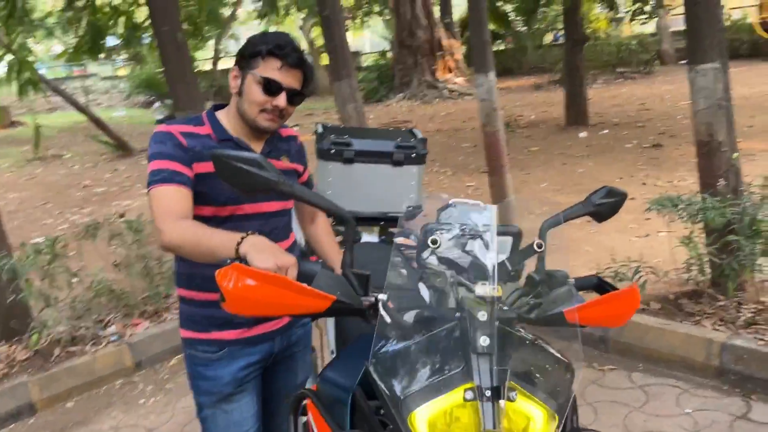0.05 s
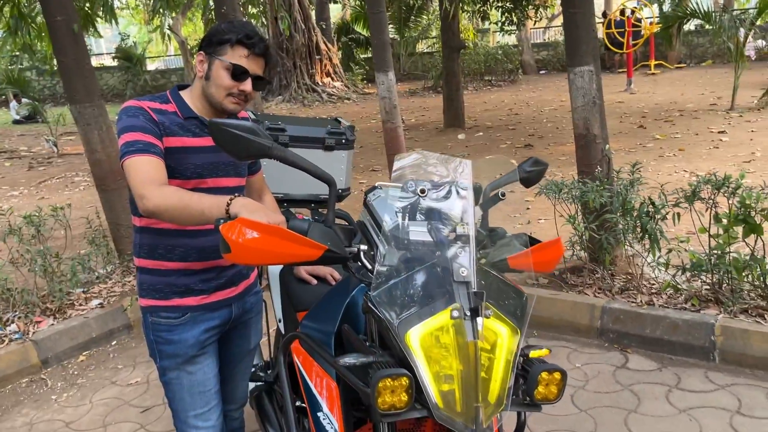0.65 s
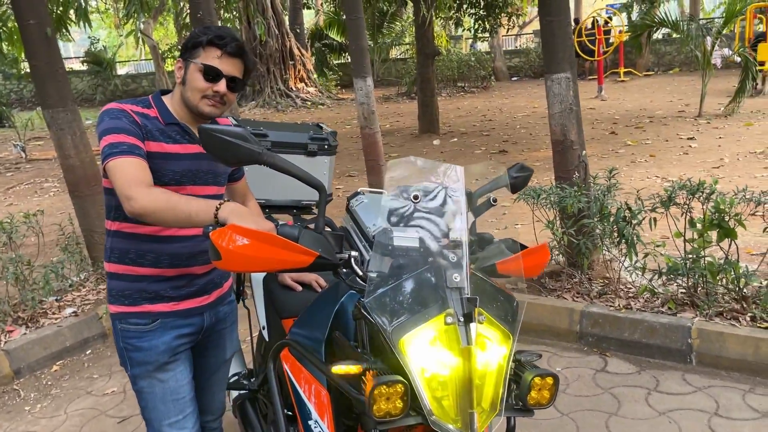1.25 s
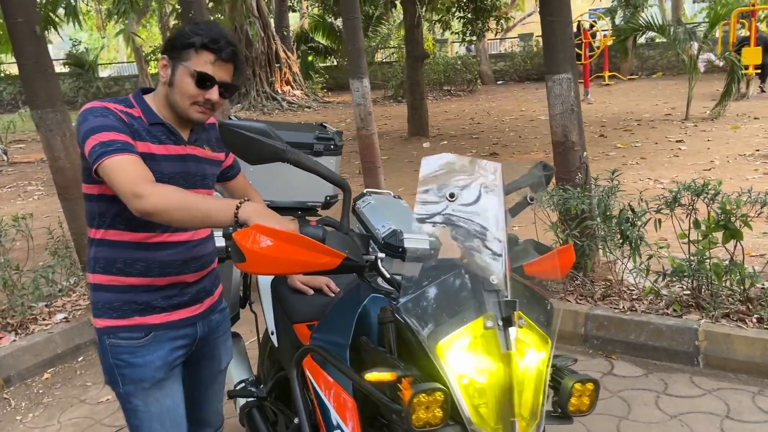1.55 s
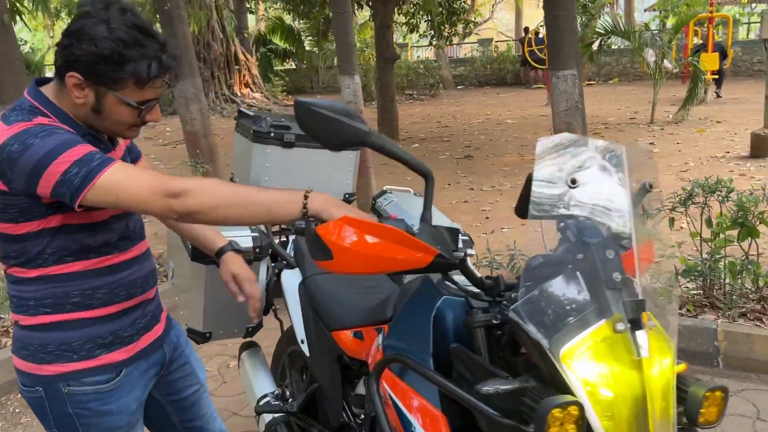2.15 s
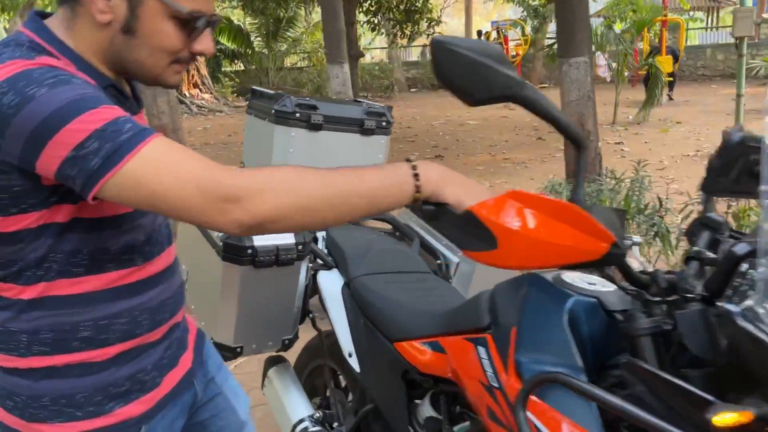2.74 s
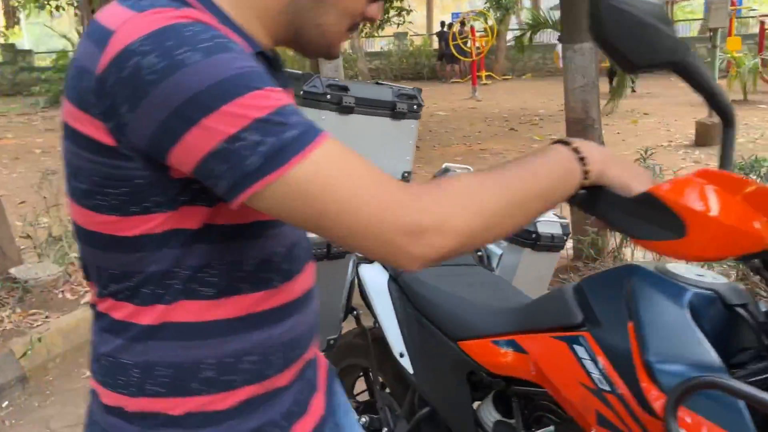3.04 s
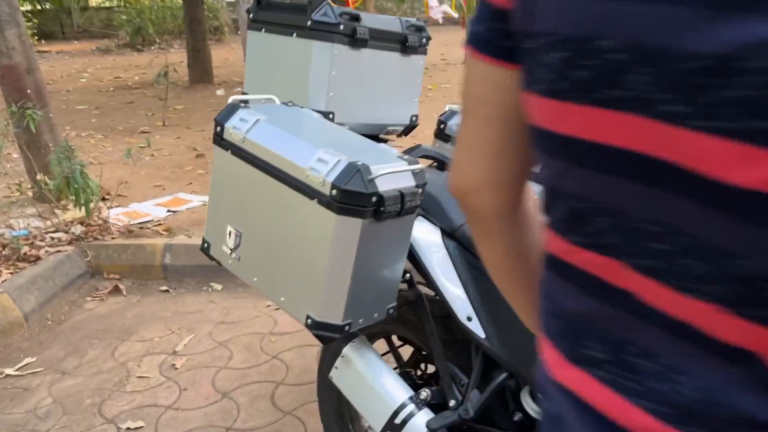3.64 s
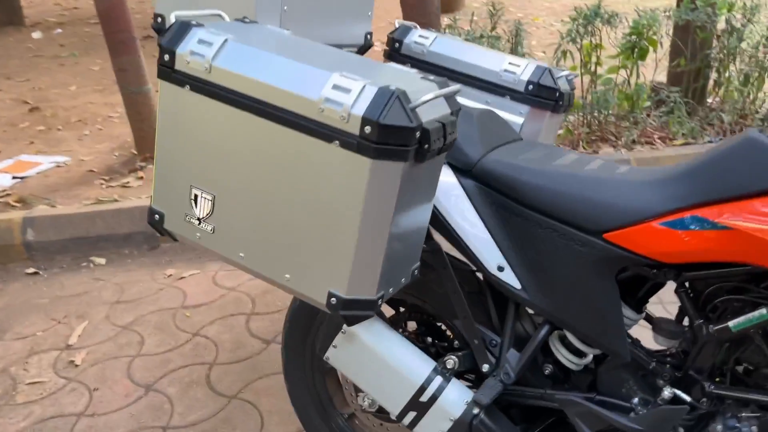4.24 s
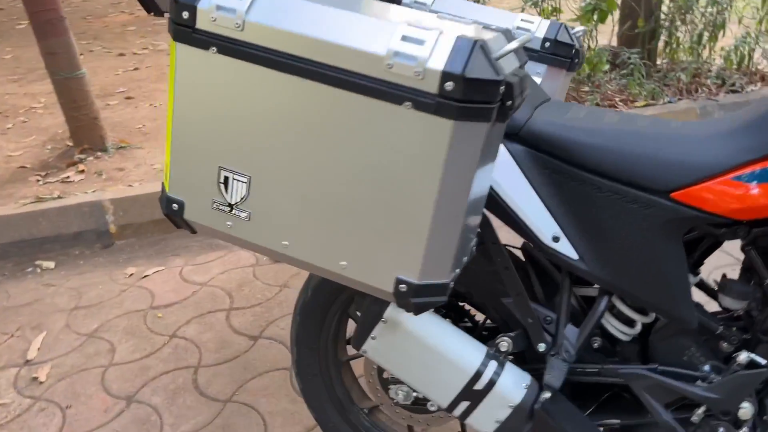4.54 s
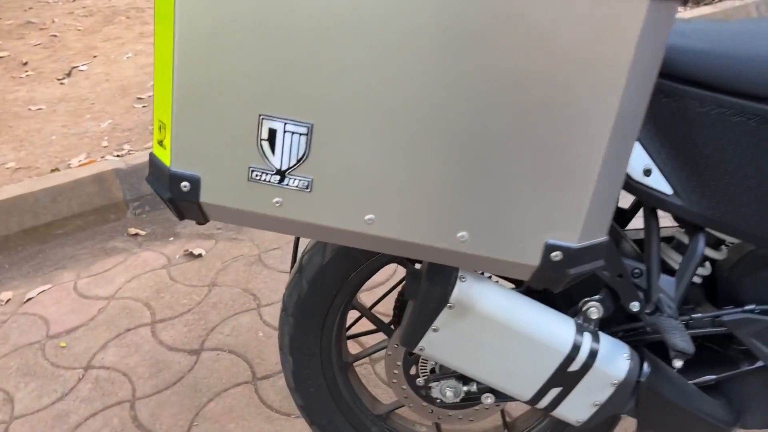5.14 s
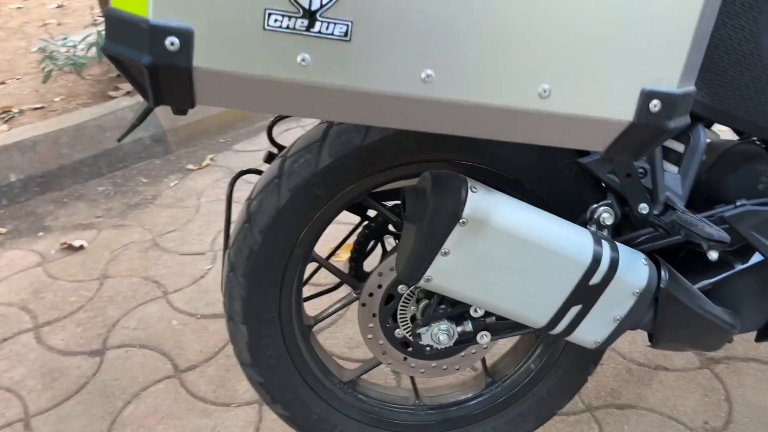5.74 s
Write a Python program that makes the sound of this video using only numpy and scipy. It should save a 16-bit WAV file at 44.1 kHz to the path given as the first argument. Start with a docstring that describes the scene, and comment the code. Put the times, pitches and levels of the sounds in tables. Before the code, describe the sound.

Outdoors, a starter grinds and a motorcycle engine fires, then idles steadily with exhaust thumps and mechanical clatter as the microphone approaches.

```python
"""A single-cylinder motorcycle is started on a paved path, over the rumble of distant traffic.
First comes a faint electric whine, then the starter gears grind through four surges. At 0.75 s the
engine catches, speeds up briefly and settles to an idle: gas pulses thump through the silencer while
piston and valves clatter. The microphone draws closer and, from 3 s, goes from the front of the bike
round to the silencer. Near 3.5 s the rider briefly blocks some clatter, and a short scuff follows."""
import sys
import numpy as np
from scipy.fft import rfft, irfft, next_fast_len
from scipy.io import wavfile
from scipy.ndimage import map_coordinates

SR = 44100
rng = np.random.default_rng(int(sys.argv[2]) if len(sys.argv) > 2 else 0)


def file_out(sig):
    """Save sig as 16-bit WAV at sys.argv[1]."""
    # one column per channel
    cols = np.atleast_2d(sig).T
    # limit, then scale
    lim = np.clip(cols, -1, 1)
    pcm = np.round(lim * 32767).astype(np.int16)
    wavfile.write(sys.argv[1], SR, pcm)


N = 264159
T = np.arange(N) / SR


def amp(db):
    """Turn decibels into a number to multiply by."""
    return 10 ** (np.asarray(db) / 20)


def unit(x):
    """Scale a signal to an average power of 1."""
    return x / np.sqrt(np.mean(x ** 2) + 1e-20)


def along(points, hz):
    """Read between (frequency, value) points on a logarithmic frequency axis."""
    f, values = np.transpose(points)
    return np.interp(np.log(hz + 1), np.log(f + 1), values)


def curve(points):
    """Join (time, value) points with straight lines, one value per sample."""
    return np.interp(T, *np.transpose(points))


def bump(middle_s, half_s):
    """A smooth, bell-shaped rise to 1 and fall back."""
    return np.exp(-((T - middle_s) / half_s) ** 2 / 2)


def wobble(rate):
    """A smooth random curve with `rate` new values a second."""
    return map_coordinates(rng.standard_normal(int(N * rate / SR) + 4), [T * rate])


def filtered(x, response):
    """Multiply each frequency f in x by response(f)."""
    size = next_fast_len(N + SR // 2)
    return irfft(rfft(x, size) * response(np.fft.rfftfreq(size, 1 / SR)), size)[..., :N]


def coloured(x, spectrum):
    """Give x the tone colour of a list of (frequency, level) points."""
    return filtered(x, lambda f: amp(along(spectrum, f)))


def resonance(f, hz, width):
    """How strongly something that rings at hz answers each frequency f; 1 at the peak."""
    return 1j * f * width / (hz * hz - f * f + 1j * f * width)


# how alike left and right are: f/Hz, likeness/0-1
LIKENESS = [(250, .99), (600, .82), (2000, .8), (12000, .7)]
def grit(spiky_db):
    """Stereo noise made of tiny contacts of uneven size, partly alike left and right."""
    def shares(f):
        angle = np.arccos(np.clip(along(LIKENESS, f), 0, 1)) / 2
        return np.array([np.cos(angle), np.sin(angle)])
    common, opposite = filtered(rng.standard_normal((2, N)), shares)
    return unit(np.array([common + opposite, common - opposite]) * amp(spiky_db * wobble(900)))


def frame_ring(x, t60, wet_db, size=8192):
    """Frame, fins and panels ring on in an ever-changing mix, fading by 60 dB in t60 seconds."""
    blocks = np.pad(x, ((0, 0), (0, -N % size + size))).reshape(2, -1, size)
    tails = rng.standard_normal(blocks.shape[1:]) * amp(-60 * T[:size] / t60)
    tails /= np.linalg.norm(tails, axis=1, keepdims=True)
    rung = irfft(rfft(blocks, 2 * size) * rfft(tails, 2 * size))
    joined = rung[..., :size] + np.roll(rung[..., size:], 1, axis=1)  # tails spill into the next block
    return x + amp(wet_db) * joined.reshape(2, -1)[:, :N]


# tone colour of the traffic: f/Hz, level/dB
TRAFFIC_COLOUR = [(25, -26), (55, 6.5), (85, 5.5), (130, -5.5), (220, -12), (500, -21), (1500, -28.5),
                  (4000, -42), (8000, -55.5), (14000, -67)]
def traffic(level_db):
    """Low, unsteady rumble of distant traffic."""
    return amp(level_db + 1.1 * wobble(6.8)) * unit(coloured(grit(spiky_db=-3), TRAFFIC_COLOUR))


# parts of the scuff: t/s, half length/s, level/dB
SCUFF_PARTS = [(3.625, 0.014, -41), (3.643, 0.0025, -34), (3.653, 0.0031, -38)]
def scuff():
    """A short gritty scuff that ends in a small click."""
    stroke = sum(amp(db) * bump(s, half_s) for s, half_s, db in SCUFF_PARTS)
    colour = [(1000, -24), (3300, 14), (7000, -2), (14000, -5)]
    return stroke * unit(coloured(grit(spiky_db=5.5), colour))


def whine(hz, level_db):
    """A thin, faint electric whine just before the starter engages."""
    return amp(level_db) * bump(0.22, 0.031) * np.sin(2 * np.pi * hz * T + 0.5 * wobble(60))


# the starter runs, and surges as it pushes through each stroke: start t/s, end t/s, level/dB
STARTER_SURGES = [(0.329, .71, -38.5), (0.358, 0.45, -33.5), (.405, 0.42, -31.5), (0.487, 0.551, -27.5),
                  (0.584, 0.637, -28), (0.692, 0.7315, -27)]
# tone colour of the grinding: f/Hz, level/dB
GRIND_COLOUR = [(100, 0), (400, -5.5), (750, 0), (1600, 6), (2200, 5.5), (2900, -1), (4400, -1),
                (6500, -10), (10000, -11.5), (14500, -20)]
# squeals of the gears: t/s, half length/s, f/Hz, level/dB
GEAR_SQUEALS = [(0.371, 0.0084, 845, -34), (.408, 0.014, 1204, -23), (.45, 0.0088, 1164, -36),
                (0.416, 0.01, 2376, -27), (0.498, 0.013, 2190, -42), (0.589, 0.0044, 2100, -35),
                (0.603, 0.0045, 2060, -33.5), (0.627, 0.0066, 2064, -33), (0.697, 0.0037, 2045, -26),
                (0.713, 0.0043, 2000, -22.5)]
def starter(chatter_hz, chatter_depth, rise_s):
    """Gear teeth grind in surges as the starter turns the engine over, and squeal under load."""
    power = 0
    for start, end, db in STARTER_SURGES:
        rise = np.clip((T - start) / rise_s, 0, 1)
        fade = np.exp(-np.maximum(T - end, 0) / 0.022)
        power += (amp(db) * rise * fade) ** 2
    uneven_hz = chatter_hz * (1 + 0.15 * wobble(25.5))
    chatter = 1 + chatter_depth * np.sin(2 * np.pi * np.cumsum(uneven_hz) / SR)
    teeth = frame_ring(grit(spiky_db=0.5), t60=0.043, wet_db=-2.5)
    grind = np.sqrt(power) * chatter * unit(coloured(teeth, GRIND_COLOUR))
    waver = 0.85 * wobble(300)
    squeal = sum(amp(db) * bump(s, half_s) * np.sqrt(2) * np.sin(2 * np.pi * hz * (T - s) + waver)
                 for s, half_s, hz, db in GEAR_SQUEALS)
    return grind + squeal * amp(1.8 * wobble(400))


# the microphone closes in on the silencer: t/s, distance/m
MIC_DISTANCE = [(1.3, 2.73), (2.1, 2), (3.1, 1.6), (4.0, 1.11), (4.7, 0.88), (5.8, .57)]
def distance():
    """How many metres away the microphone is at each sample."""
    return curve(MIC_DISTANCE)


# the way round the bike: t/s, place/0-1
MIC_PLACE = [(3.0, 0.019), (4.7, 1)]
def place():
    """Where the microphone is: 0 in front, 1 beside the silencer."""
    return curve(MIC_PLACE)


def walk_round(front, side):
    """Blend the front sound into the side sound as the microphone moves."""
    return (1 - place()) * unit(front) + place() * unit(side)


IDLE_HZ = 14.2
# the idle drifts around 14 firings a second: t/s, f/Hz
IDLE_DRIFT = [(1.65, 13.599), (1.9, 14.556), (2.25, 13.698), (2.5, 15.208), (3.1, 13.834), (3.35, 15.279),
              (3.55, 13.85), (3.75, 14.853), (4.1, 14.224), (4.85, 13.784), (5.15, 12.38), (5.5, 14.612),
              (5.7, 13.716), (6.0, 14.529)]
def speed(flare_s=0.7994, rise_s=0.1645, fall_s=0.5759, extra_hz=6.3395):
    """Firings per second: the idle, plus one flare that rises quickly and falls slowly."""
    flare = np.interp(T - flare_s, [0, rise_s, rise_s + fall_s], [0, 1, 0])
    return curve(IDLE_DRIFT) + extra_hz * flare


def crank(catch_s):
    """Count engine cycles, reaching 1 at catch_s; from then on each whole number is a firing."""
    cycles = np.cumsum(speed()) / SR
    return cycles - np.interp(catch_s, T, cycles) + 1


# how much of the engine the fairing (the bike's front shell) hides: t/s, cover/0-1
FAIRING_COVER = [(1.7, 1), (2.7, 0.03)]
# the rider's body, then his arm, passes in front of the engine: t/s, half length/s, cover/0-1
RIDER_COVER = [(3.518, 0.093, 0.9), (3.795, 0.15, 0.33)]
# each noise by name: level/dB at idle from 1 m, gain/dB at twice the speed, gain/dB at half the
# distance, loss/dB behind the fairing, loss/dB behind the rider
NOISE_LEVELS = {"thud": (-35, 7, 1.5, 3, 0), "knock": (-34, 1, 1.83, 0, 2),
                "rattle": (-35, 7, .5, 6.5, 6.5), "tick": (-49.5, 9.5, 2, 3.5, 5.5)}
def loudness(name):
    """Gain of an engine noise: louder when fast and near, weaker behind the fairing or the rider."""
    level_db, speed_db, near_db, fairing_db, rider_db = NOISE_LEVELS[name]
    rider = sum(cover * bump(s, half_s) for s, half_s, cover in RIDER_COVER)
    shadow_db = fairing_db * curve(FAIRING_COVER) + rider_db * rider
    open_db = level_db + speed_db * np.log2(speed() / IDLE_HZ) - near_db * np.log2(distance())
    return amp(open_db - shadow_db)


# notes the piston sets ringing: point in cycle/cycles, f/Hz, time to fade 60 dB/s,
# front level/dB, side level/dB
SLAP_NOTES = [(.07, 1270, .06, 6, -4), (.04, 400, .06, -14, 2), (.64, 1290, .045, 4, 0),
              (.66, 980, .03, -5, -2), (.67, 2354, .13, -18, -.5), (.68, 2560, .03, -3, -8),
              (.72, 3020, .03, -5, -11), (.68, 756, .06, -4, 3.5)]
def piston_slaps(cycles, scatter_db, detune):
    """In every cycle the piston slaps the cylinder wall and leaves short notes ringing."""
    sideways, t, out = place(), T[:SR // 8], np.zeros(N + SR)
    rise = 1 - np.exp(-t / 0.0039)
    for angle, hz, t60, front_db, side_db in SLAP_NOTES:
        starts = np.flatnonzero(np.diff(np.floor(cycles - angle)) > 0)
        for i, (size, pitch, phase) in zip(starts, rng.standard_normal(size=(128, 3))):
            level_db = front_db + (side_db - front_db) * sideways[i] + scatter_db * size
            ring = np.sin(2 * np.pi * (hz * (1 + detune * pitch / t60) * t + phase))
            out[i:i + len(t)] += 2 * amp(level_db - 60 * t / t60) * rise * ring
    return out[:N]


# blows in one engine cycle: point in cycle/cycles, fade/cycles, level/dB of thud, knock, rattle, tick
BLOWS = [(-.06, .05, 1.5, -4.5, -8, -11), (.07, .07, -5.5, -4, -6.5, -20), (.15, .04, -9, -9, -3.5, 5),
         (.25, .07, -4.5, -14, -24, -22), (.465, .035, -15, -9.5, -12, 3), (.645, 0.024, -6, 3.5, 3.5, 4),
         (.75, 0.021, 1.5, -0.5, -1, -8), (.86, 0.03, -1.5, -3.5, -2, 4.5)]
# tone colours of the four noises, from dull to bright: f/Hz, level/dB
THUD_COLOUR = [(90, -48), (160, 11), (210, 3.5), (270, 3), (480, -6), (620, -6.5), (1000, -50.5)]
KNOCK_COLOUR = [(350, -31), (600, 0.5), (850, -1), (1100, 1), (1450, 2), (1750, -6), (2600, -47)]
RATTLE_COLOUR = [(1100, -28), (1800, 0), (2300, 1), (2900, 0), (3600, -3.5), (5000, -7), (7000, -10),
                 (11000, -62)]
TICK_COLOUR = [(4000, -22), (7000, -15), (10300, 13.5), (12500, 8.5), (14500, 1)]
# notes of the metal cases and covers: f/Hz, width/Hz, front level/dB, side level/dB
CASE_NOTES = [(343, 58, -4, -7), (476, 48, 0.5, 7.5), (765, 7.8, -3.5, 3), (1252, 65, -2.5, 0),
              (2362, 14, 4.5, 9), (2550, 210, -14, 1), (3060, 67, -23, 1), (3790, 25, -24, 3),
              (4195, 22, 2, -21), (4670, 17, -7, -5)]
def clatter(cycles, name, spiky_db, scatter_db, steady_db=-12, step=16):
    """Dull exhaust thuds, and strikes of piston, valves and cam chain, come at set points in each cycle and
    ring the metal cases."""
    column, colour = {"thud": (0, THUD_COLOUR), "knock": (1, KNOCK_COLOUR),
                      "rattle": (2, RATTLE_COLOUR), "tick": (3, TICK_COLOUR)}[name]
    power = amp(steady_db) ** 2
    for angle, fade, *levels_db in BLOWS:
        # which cycle this is, and how much of a cycle has passed since the blow
        count, age = np.divmod(cycles[::step] - angle - np.floor(cycles[0]) + 2, 1)
        force = amp(levels_db[column] + scatter_db * rng.standard_normal(128))
        rise = 1 - np.exp(-age / 0.027)
        power += (force[count.astype(int)] * rise) ** 2 * np.exp(-age / fade)
    strength = np.interp(T, T[::step], np.sqrt(power))
    blows = frame_ring(strength * grit(spiky_db), t60=0.053, wet_db=-10)

    def cases(f):
        notes = sum(amp([[[front]], [[side]]]) * resonance(f, hz, width)
                    for hz, width, front, side in CASE_NOTES)
        return amp(along(colour, f)) * (1 + notes)
    return loudness(name) * unit(walk_round(*filtered(blows, cases)))


# deep notes of pipe and silencer: f/Hz, width/Hz, front level/dB, side level/dB
PIPE_NOTES = [(61.8, 15.8, -3.5, -4), (78.6, 10.7, 6, 9), (118.6, 30.7, -1.56, -2), (139.8, 12, -2.5, -8.5)]
# tone colour of gas swirling out of the pipe: f/Hz, level/dB
PUFF_COLOUR = [(20, -24), (55, 8), (110, 4.5), (200, -8), (400, -44), (900, -79)]
def exhaust(cycles, scatter_db, puff_db):
    """One gas pulse per firing booms through the silencer and leaves as a swirling puff."""
    fired = np.flatnonzero((np.diff(np.floor(cycles)) > 0) & (cycles[1:] >= 1))
    pulses = np.zeros(N)
    pulses[fired] = amp(scatter_db * rng.standard_normal(len(fired)))

    def pipe(f):
        return sum((-1) ** k * amp([[front], [side]]) * resonance(f, hz, width)
                   for k, (hz, width, front, side) in enumerate(PIPE_NOTES))
    boom = unit(walk_round(*filtered(pulses, pipe)))
    puff = (cycles >= 1) * np.exp(-(cycles % 1) / 1.1) * rng.standard_normal(N)
    return boom + amp(puff_db) * unit(coloured(puff, PUFF_COLOUR))


def engine():
    """The exhaust thumps and puffs dully after each firing while the moving parts clatter, from knocks to fine
    ticks."""
    cycles = crank(catch_s=0.7545)
    exhaust_db = -18 - np.log2(speed() / IDLE_HZ)  # from 1 m; 1 dB softer at twice the speed
    thumps = amp(exhaust_db) / distance() * exhaust(cycles, scatter_db=0.42, puff_db=-13.5)
    # beside the silencer the engine block is farther away, so its noise arrives later
    late = np.interp(T - 0.00276 * place(), T, cycles)
    thud = clatter(late, "thud", spiky_db=0.5, scatter_db=1.3)
    knock = clatter(late, "knock", spiky_db=1.5, scatter_db=2)
    rattle = clatter(late, "rattle", spiky_db=0.5, scatter_db=2.1)
    tick = clatter(late, "tick", spiky_db=1, scatter_db=3.5, steady_db=-5.5)
    slap = amp(-1.7) * loudness("knock") * piston_slaps(late, scatter_db=2, detune=0.0006)
    running = np.clip((cycles - 0.8) / 0.44, 0, 1)  # fades in around the first firing
    return thumps + running * (thud + knock + rattle + tick + slap)


# how much louder the left side is than the right: f/Hz, level/dB
LEFT_LOUDER = [(60, 1), (200, 2.5), (370, 0.5), (690, -5.5), (1270, -5.5), (2330, 1.5), (4290, 5.5),
               (7900, 0), (14500, 0)]
# how far the left wave runs ahead of the right: f/Hz, phase/rad
LEFT_AHEAD = [(200, 0), (400, -.55), (650, -1.4), (1100, -1.7), (1640, -1.8), (2200, -.3), (4000, 1),
              (6000, -1), (7400, -1.6), (8400, -3.1), (9300, -5), (11000, -6.1), (14000, -6.6)]
def scene():
    """All the sounds together, reaching left and right with slightly different level and timing."""
    starting = whine(hz=4050, level_db=-61) + starter(chatter_hz=61.4, chatter_depth=0.1, rise_s=0.00091)
    sound = starting + engine() + scuff() + traffic(level_db=-37)
    sides = np.array([[0.5], [-0.5]])

    def stereo(f):
        return amp(sides * along(LEFT_LOUDER, f)) * np.exp(1j * sides * along(LEFT_AHEAD, f))
    return filtered(sound, stereo)


def record(dry):
    """Take away the deepest bass and the highest treble."""
    low_hz, top_hz = 12.0, 14600
    return filtered(dry, lambda f: (f < top_hz) * f ** 2 / np.sqrt(f ** 4 + low_hz ** 4))


dry = scene()
out = record(dry)
file_out(out)
```